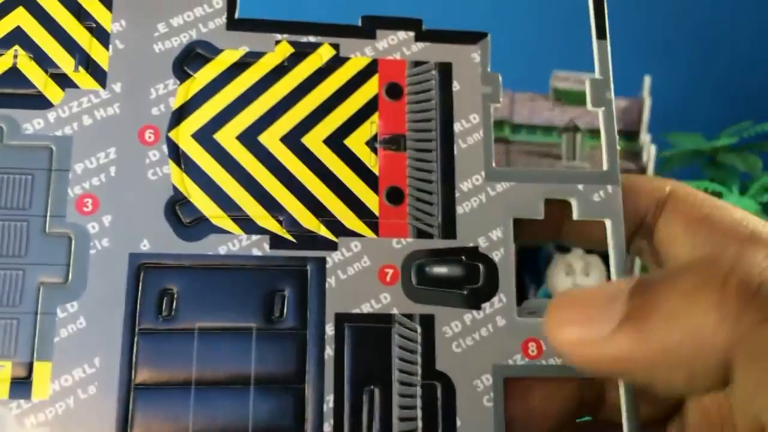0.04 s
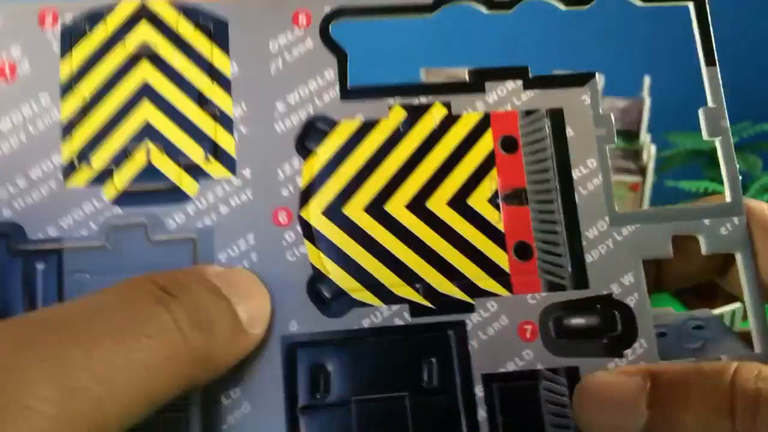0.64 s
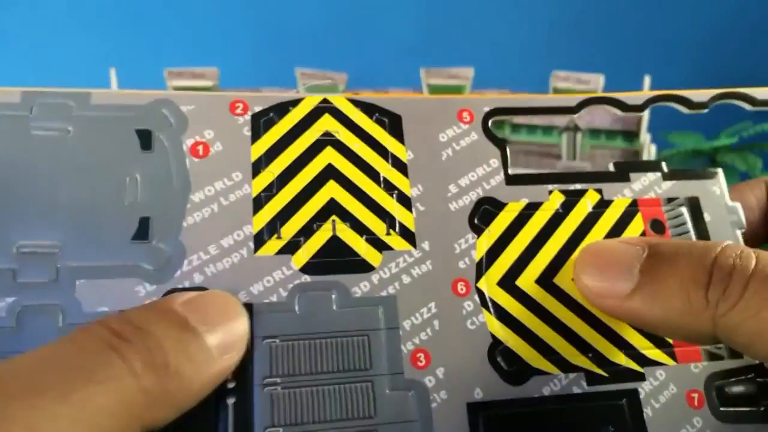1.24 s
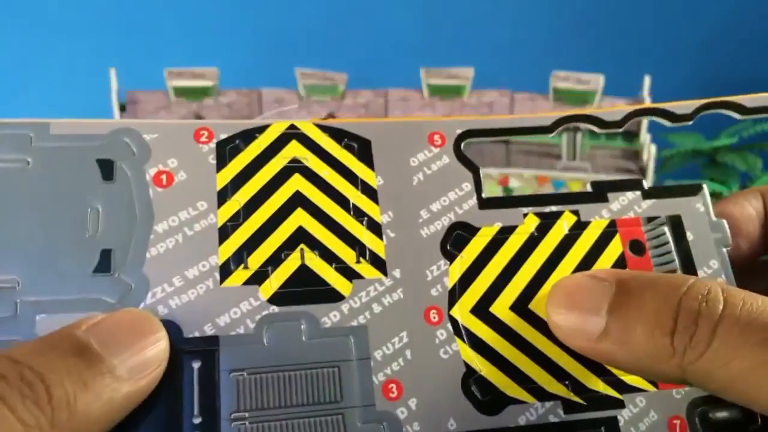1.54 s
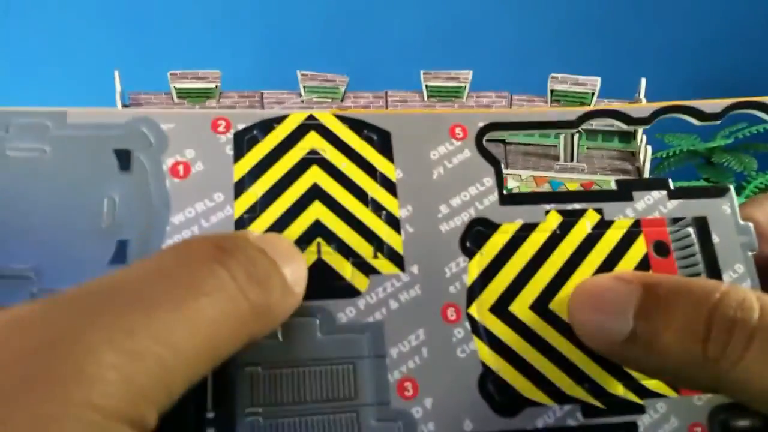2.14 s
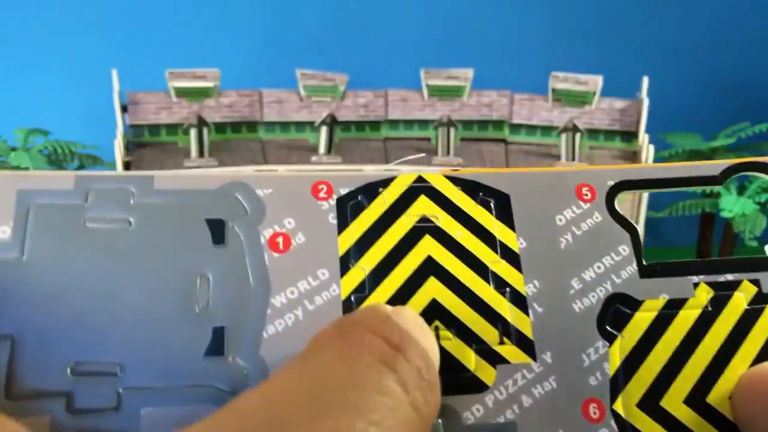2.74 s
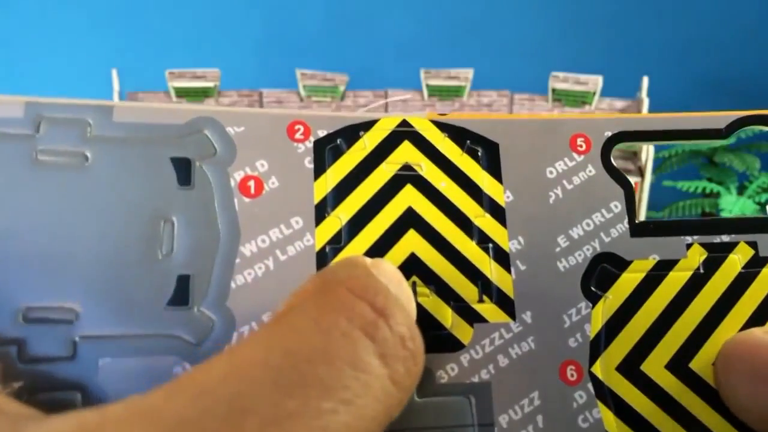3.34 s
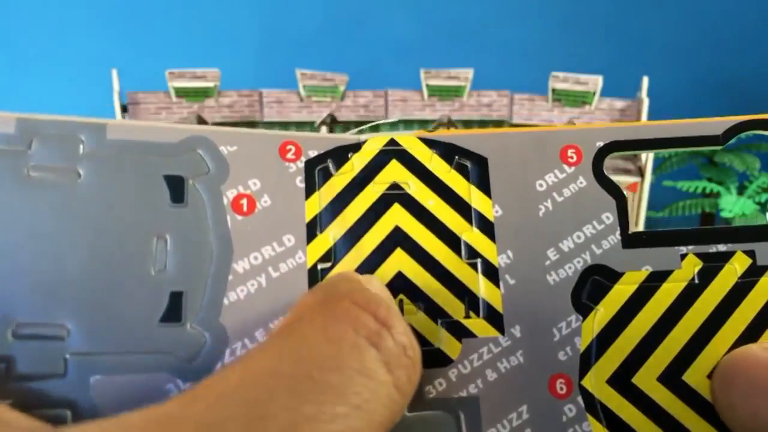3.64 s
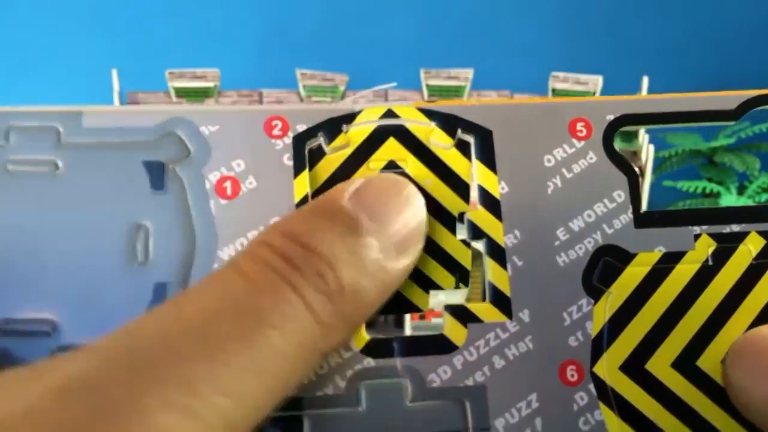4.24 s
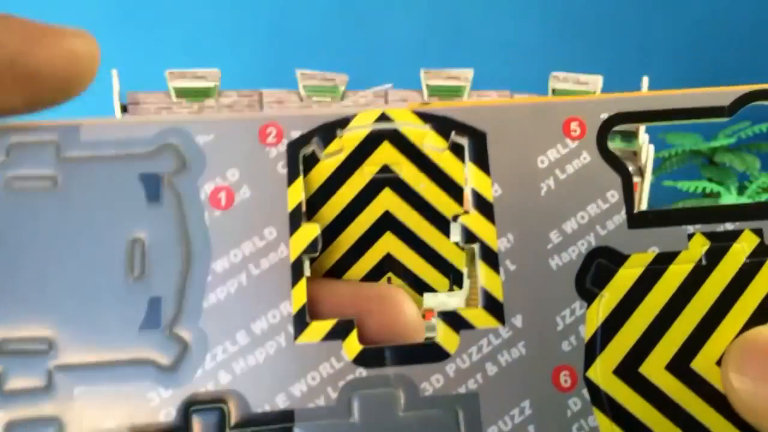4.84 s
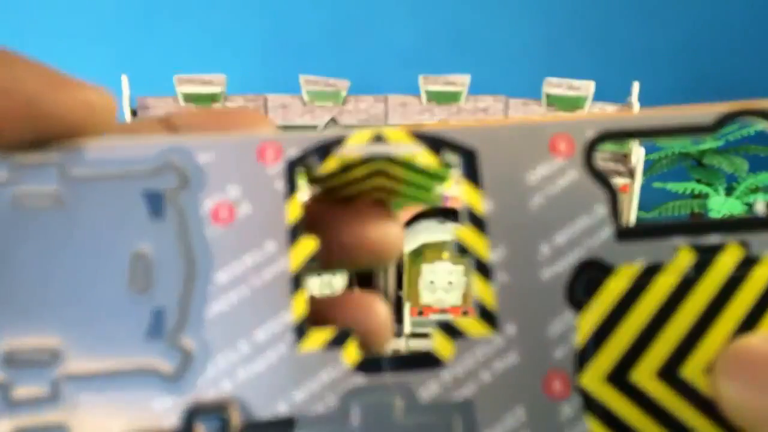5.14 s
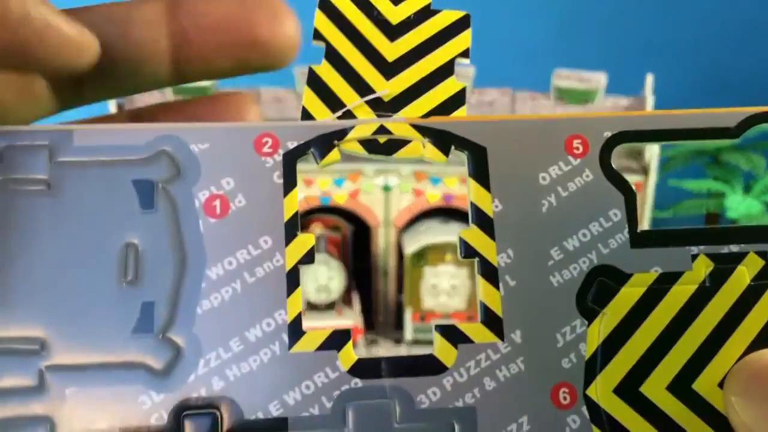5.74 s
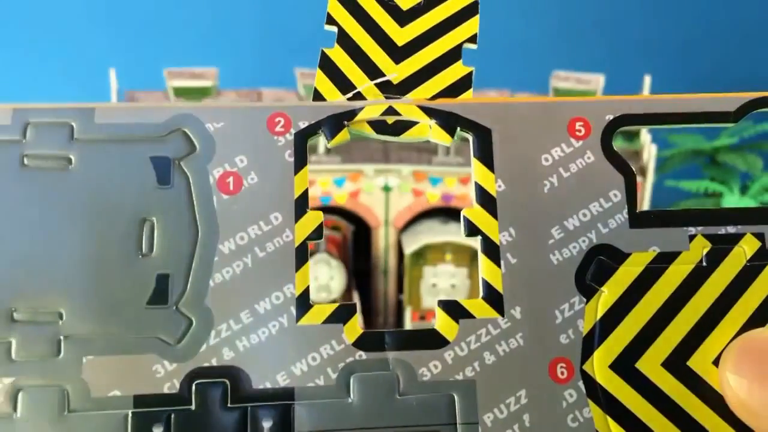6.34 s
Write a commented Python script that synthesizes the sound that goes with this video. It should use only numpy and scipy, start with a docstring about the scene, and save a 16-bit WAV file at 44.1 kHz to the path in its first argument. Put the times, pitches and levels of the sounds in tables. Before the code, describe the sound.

In a room with a faint low hum, a foam puzzle sheet is handled up close, ticking and rasping under the fingers. A faraway bird starts to whistle, and the tabs of a piece break with two loud clusters of crackling snaps. Lighter scrapes, clicks and knocks follow as the piece is pushed out, while the bird finishes with a trill. Then the handling stops.

```python
"""Over the low rumble and hum of a room, fingers slide on a printed foam puzzle board near the microphone.
Friction hisses and rasps, and the bent foam ticks and creaks. From about 3 s a distant songbird sings
one phrase, smeared by echoes from walls. Near 3.6 s and 3.9 s the tabs of a die-cut piece tear in two
bursts of snaps. The freed piece creaks, scrapes and knocks against the frame while the bird ends on
a trill; at about 6 s the hands come to rest."""
import sys
import numpy as np
from scipy import signal
from scipy.fft import rfft, irfft
from scipy.io import wavfile
from scipy.ndimage import uniform_filter1d

SR = 44100
rng = np.random.default_rng(int(sys.argv[2]) if len(sys.argv) > 2 else 0)


def to_wav(s):
    """Save 16-bit WAV."""
    ch = np.atleast_2d(s).T  # columns
    pcm = np.round(np.clip(ch, -1, 1) * 32767)  # PCM
    wavfile.write(sys.argv[1], SR, pcm.astype(np.int16))


N = 286650
TIME = np.arange(N) / SR


def gain_of(db):
    """Amplitude ratio of a level: a factor of ten for every 20 dB."""
    return 10 ** (np.asarray(db) / 20)


def unit_rms(x):
    """Normalisation to an rms amplitude of 1."""
    return x / np.sqrt(np.mean(x ** 2) + 1e-20)


def at_frequency(points, hz):
    """Interpolation of (f/Hz, value) rows on a logarithmic frequency axis."""
    f, value = np.transpose(points)
    return np.interp(np.log(hz + 1), np.log(f + 1), value)


def add(mix, start_s, sound):
    """Superposition: a sound adds to the mix from its onset on."""
    part = mix[max(round(start_s * SR), 0):][:len(sound)]
    part += sound[:len(part)]


def colour(x, spectrum):
    """Minimum-phase filtering: the spectrum is shaped causally, so attacks stay sharp."""
    hz = abs(np.fft.fftfreq(4096, 1 / SR))
    log_gain = np.log(gain_of(at_frequency(spectrum, hz)))
    taps = np.fft.ifft(np.exp(np.conj(signal.hilbert(log_gain)))).real
    return signal.oaconvolve(x, taps[:len(taps) // 2])[:N]


def drift(cutoff_hz):
    """Low-pass noise: a slow random fluctuation of rms 1."""
    hz = np.fft.rfftfreq(N, 1 / SR)
    return unit_rms(irfft(rfft(rng.standard_normal(N)) / (1 + (hz / cutoff_hz) ** 4), N))


def patchy(x, depth_db, bins):
    """Random amplitude modulation: patches of time and frequency swell and fade; rms 1."""
    spectra = signal.stft(x, nperseg=512, noverlap=384)[2]
    field = uniform_filter1d(rng.standard_normal(spectra.shape), bins, axis=0)
    field = uniform_filter1d(field, bins // 2, axis=1)
    spectra = spectra * gain_of(depth_db * unit_rms(field))
    return unit_rms(signal.istft(spectra, nperseg=512, noverlap=384)[1][:N])


def reverb(x, decays, build_s):
    """Diffuse reverberation: a noise tail of unit energy decays exponentially in each band."""
    hz, t, spectra = signal.stft(rng.standard_normal(SR), SR, nperseg=256)
    fade = gain_of(-60 * t / at_frequency(decays, hz)[:, None])
    build_up = 1 - np.exp(-t / build_s)
    tail = signal.istft(spectra * fade * build_up, SR, nperseg=256)[1]
    return signal.oaconvolve(x, tail / np.linalg.norm(tail))[:N]


def rumble():
    """Ambient noise: the room's background is mostly low in frequency and slightly restless in level."""
    # spectrum of the background: f/Hz, level/dB
    spectrum = [(20, -21.5), (50, -5.5), (90, -0.5), (135, -0.5), (180, 2.5), (240, -2), (320, -6.5),
                (450, -6.5), (700, -14), (1100, -20.5), (2400, -31), (5000, -35.5), (12500, -47.5),
                (16000, -42.5)]
    air = colour(patchy(rng.standard_normal(N), depth_db=2.5, bins=8), spectrum)
    return unit_rms(air) * gain_of(-55 + 1.2 * drift(cutoff_hz=6.3))


def hum():
    """Frequency and amplitude modulation: faint low tones in the room waver at random."""
    # tones of the hum: f/Hz, rms level/dB
    tones = [(88, -70), (175, -66), (258, -74), (312, -67.5)]
    out = np.zeros(N)
    for hz, db in tones:
        cycles = np.cumsum(hz + 2.5 * drift(cutoff_hz=8)) / SR
        amplitude = np.sqrt(2) * gain_of(db + 2 * drift(cutoff_hz=1.9))
        out += amplitude * np.sin(2 * np.pi * cycles)
    return out


def syllables(contour, notes, roughness):
    """Frequency modulation: each note glides along a contour, with random tremble scaled by roughness."""
    times, hz, db = np.transpose(contour)
    t, out = np.arange(0, times[-1], 1 / SR), np.zeros(N)
    swell = gain_of(np.interp(t, times, db)) * signal.windows.tukey(len(t), 0.15)
    for start_s, level_db, ratio in notes:
        unsteady = roughness * gain_of(-(level_db + 40) / 2)  # soft notes are less steady
        tremble = unsteady * unit_rms(uniform_filter1d(rng.standard_normal(len(t)), size=60))
        phase = 2 * np.pi * np.cumsum(ratio * np.interp(t, times, hz) * (1 + tremble)) / SR
        tone = np.sin(phase) + gain_of(-26) * np.sin(2 * phase)
        add(out, start_s, gain_of(level_db) * swell * tone)
    return out


def bird():
    """Multipath propagation: whistles, slurs, arches and a trill arrive mostly by reflection from walls."""
    # syllable contours: t/s from the onset, f/Hz, level/dB
    whistle = [(0, 2246, -10.5), (.012, 2321, 6), (.05, 2420, -3.5), (.07, 2430, -20)]
    slur = [(0, 3700, -18.5), (.02, 3300, -1.5), (.04, 2970, -4), (.06, 2980, -18.5), (.075, 3150, -11)]
    arch = [(0, 3240, -19), (.017, 3350, -4), (.03, 3860, -1.5), (.038, 3972, 2.5), (.048, 3584, 0),
            (.057, 2975, 3.5), (.068, 2480, -9)]
    chip = [(0, 3130, 10), (.005, 2963, 2), (.012, 2500, 2.5), (.02, 1950, -0.5), (.03, 1542, -17)]
    squeak = [(0, 6600, -24), (.012, 6640, 2.5), (.024, 7700, 12.5), (.034, 6700, -12), (.046, 5600, 1),
              (.054, 5200, -11)]
    # notes sung on those contours: t/s, level/dB, frequency ratio
    whistles = [(2.909, -61.5, 1.02), (3.371, -57.5, 0.75), (3.712, -42.5, 1.0), (4.04, -51.5, .89)]
    slurs = [(3.105, -58, 1.26), (3.728, -32.5, 0.98), (4.516, -45.5, 0.53), (4.688, -49, 0.48),
             (4.861, -45.5, 0.52)]
    arches = [(4.175, -35.5, 0.98), (4.293, -35, 0.93), (4.394, -34, 0.97)]
    trill = [(4.575, -39, 0.93), (4.741, -38.5, .97), (4.904, -37, 0.95), (5.07, -39, 0.93),
             (5.239, -39, .94), (5.418, -40, 0.99)]
    # wall reflections: delay t/s, level/dB
    walls = [(.056, -11.5), (.083, -13.5)]
    # reverberation time outdoors: f/Hz, T60/s
    yard = [(1500, 0.67), (3500, 0.8), (7000, 0.76)]
    # a softer squeak follows every chip of the trill but the last
    squeaks = [(start_s + 0.069, db - 13.5, ratio * 0.94) for start_s, db, ratio in trill[:-1]]
    song = syllables(whistle, whistles, roughness=0.025)
    song += syllables(slur, slurs, roughness=0.012)
    song += syllables(arch, arches, roughness=0.008)
    song += syllables(chip, trill, roughness=0.028)
    song += syllables(squeak, squeaks, roughness=0.022)
    heard = gain_of(-3.5) * song  # direct path
    for delay_s, db in walls:
        add(heard, delay_s, gain_of(db) * song)
    early_echoes = rng.standard_normal(2500) * signal.windows.tukey(2500, 0.2)
    heard += gain_of(-0.5) * signal.oaconvolve(song, early_echoes / np.linalg.norm(early_echoes))[:N]
    return heard + gain_of(-2) * reverb(song, yard, build_s=0.01)


def board(force):
    """Modal response: the sheet follows a force at once, then rings briefly in its damped modes."""
    # modes of the board: f/Hz, level/dB, T60/s
    modes = [(380, -35.5, 0.025), (690, -33.5, 0.029), (797, -22, 0.031), (986, -34, 0.041),
             (1092, -30.5, 0.031), (2105, -29.5, 0.01), (3720, -13.5, 0.0099)]
    t = TIME[:SR // 8]
    ring = sum(gain_of(db - 60 * t / t60) * np.cos(2 * np.pi * hz * t) for hz, db, t60 in modes)
    return force + gain_of(-16.5) * signal.oaconvolve(force, ring)[:N]


def swing(hz, decay_cycles=1.1):
    """Damped oscillation: the sheet swings a few times while the hands absorb its energy."""
    t = TIME[:SR // 8]
    return np.exp(-t * hz / decay_cycles) * np.sin(2 * np.pi * hz * t)


def tear(decay_s, attack_s=0.00019):
    """Fracture noise: breaking foam cells give a short burst with the energy of 5 ms at rms 1."""
    t = TIME[:512]
    envelope = (1 - np.exp(-t / attack_s)) ** 2 * np.exp(-t / decay_s)
    spectrum = rfft(rng.standard_normal(len(t)) * envelope)
    flattened = spectrum / np.sqrt(abs(spectrum) + 1e-9)  # each burst keeps some colour of its own
    burst = irfft(flattened) * np.sqrt(envelope)
    return burst / np.linalg.norm(burst) * np.sqrt(0.005 * SR)


def stroke(t, length_s, attack_s=0.0076, release_s=0.015):
    """Envelope of sliding: a finger eases up to speed near t = 0, slides on and comes to rest."""
    t = t - attack_s
    rise = np.tanh(t / (2 * attack_s))
    fall = np.tanh((t - length_s) / (2 * release_s))
    return (1 + rise) / 2 * (1 - fall) / 2


def contact():
    """Incoherent sources add in power: strokes and a fluttering grip set the gains of hiss and rasp."""
    # strokes of skin or a cut edge over the board: t/s, duration/s, hiss level/dB, rasp level/dB
    strokes = [(0, 0.051, -52, -64), (0.354, 0.084, -53.5, -64), (0.462, 0.071, -48, -61),
               (0.652, 0.044, -42.5, -46.5), (0.742, .06, -51.5, -48.5), (0.8, 0.054, -43.5, -50),
               (0.881, 0.042, -40.5, -48), (0.994, 0.046, -47, -50), (1.06, 0.1, -56, -64),
               (1.142, 0.069, -42, -47.5), (1.248, 0.1, -51, -58), (1.347, 0.072, -43, -51),
               (1.453, 0.071, -51, -51.5), (1.535, .055, -52.5, -58.5), (1.968, .1, -44.5, -47),
               (2.087, .04, -44, -42), (2.32, 0.41, -64, -61), (2.607, 0.042, -46.5, -44),
               (2.68, 0.021, -41.5, -45), (2.766, 0.025, -46, -68), (3.057, 0.28, -64.5, -59),
               (3.191, 0.054, -57.5, -56), (3.315, 0.066, -56, -48.5), (3.368, 0.092, -44, -56),
               (3.478, 0.26, -41.5, -51), (3.704, 0.13, -48.5, -55), (3.851, 0.17, -40.5, -46),
               (4.03, 0.14, -59, -62), (4.2, 0.14, -52, -52), (4.323, 0.21, -47.5, -51.5),
               (4.422, 0.058, -38, -36.5), (4.502, 0.057, -48.5, -72), (4.588, 0.018, -38, -39),
               (4.66, 0.52, -57.5, -57), (5.13, 0.21, -53, -51.5), (5.335, 0.13, -48, -46),
               (5.466, 0.28, -51.5, -54), (5.845, 0.1, -56, -54)]
    holding_hand = (0, 5.98, -73, -67)  # one long, faint stroke
    t = TIME[::32]
    powers = sum(np.outer(gain_of([hiss_db, rasp_db]), stroke(t - start_s, length_s)) ** 2
                 for start_s, length_s, hiss_db, rasp_db in [holding_hand, *strokes])
    flutter = gain_of(1.8 * drift(cutoff_hz=32.5))
    return [np.interp(TIME, t, np.sqrt(power)) * flutter for power in powers]


def friction(catches_per_s, spread_db, smooth):
    """Shot noise: many tiny catches of uneven size lie over the white noise of a smooth slide."""
    sizes = gain_of(spread_db * np.minimum(rng.exponential(1, N), 2.5))
    catches = sizes * rng.choice([-1, 1], N) * (rng.random(N) < catches_per_s / SR)
    return unit_rms(unit_rms(catches) + smooth * rng.standard_normal(N))


def rubbing(ticks_per_s=27, tick_db=-1.5):
    """Sliding friction: the contact hisses, drives the board to rasp and ticks over cut lines."""
    # spectra of the contact hiss and of the rasping force: f/Hz, level/dB
    hiss_spectrum = [(200, -42), (1000, -3.5), (2200, 0), (3500, -1), (5500, -1.5), (8000, 0), (10000, 0.5),
                     (12000, 3), (14000, 1), (16000, -4)]
    rasp_spectrum = [(40, -7.5), (150, 12.5), (350, 10.5), (550, 6), (850, -2.5), (1250, 4.5), (1800, 6.5),
                     (2800, -1), (5000, -6.5), (12000, -20.5)]
    hiss_gain, rasp_gain = contact()
    hiss = patchy(friction(catches_per_s=5700, spread_db=3.5, smooth=0.25), depth_db=2, bins=10)
    rasp = patchy(friction(catches_per_s=900, spread_db=2, smooth=0.93), depth_db=3.5, bins=6)
    catches = rng.uniform(0.33, 2.4, N) * (rng.random(N) < ticks_per_s / SR)
    ticks = signal.oaconvolve(gain_of(tick_db) * hiss_gain * catches, tear(decay_s=0.003))[:N]
    surface = colour(hiss * hiss_gain + ticks, hiss_spectrum)
    return surface + board(colour(rasp * rasp_gain, rasp_spectrum))


def skids():
    """Nearly periodic stick-slip: skin or a cut edge gives a gliding whistle of narrow-band noise."""
    # skids: t/s, duration/s, level/dB, first f/Hz, last f/Hz
    glides = [(0.804, 0.047, -43.5, 9500, 9900), (.84, 0.1, -47, 11600, 12700),
              (1.146, .07, -49, 1800, 1767), (1.479, 0.028, -51.5, 1895, 2160),
              (1.956, .10, -45.5, 10900, 11400), (1.975, .075, -50.5, 880, 964),
              (3.545, 0.041, -41.5, 5560, 5330), (4.434, 0.058, -44.5, 655, 740),
              (4.436, 0.052, -42.5, 1093, 1220)]
    out = np.zeros(N)
    for start_s, length_s, db, first_hz, last_hz in glides:
        n = round(length_s * SR)
        hz = np.linspace(first_hz, last_hz, n)
        width_hz = 150 + 0.14 * first_hz
        pole = np.exp(-np.pi * width_hz / SR)
        noise = rng.standard_normal(n) + 1j * rng.standard_normal(n)
        jitter = signal.lfilter([1], [1, -2 * pole, pole * pole], noise)
        whistle = (jitter * np.exp(2j * np.pi * np.cumsum(hz) / SR)).real
        add(out, start_s, gain_of(db) * unit_rms(whistle) * signal.windows.tukey(n, 0.5))
    return out


def creaks(slips_per_s=160, unevenness=0.4, spread_db=1):
    """Irregular stick-slip: bent foam creaks in runs of small slips, as rows of t/s, level/dB, f/Hz."""
    # runs of slips: t/s, duration/s, level/dB, f/Hz
    runs = [(1.981, .06, -38.5, 800), (2.488, .006, -40, 1400), (2.561, .006, -32, 2300),
            (2.625, .025, -37.5, 1900), (2.69, .022, -30.5, 2300), (3.228, .005, -34.5, 2200),
            (3.335, .016, -36.5, 850), (3.521, .02, -25, 2400), (4.2, .09, -42.5, 430),
            (4.611, .015, -36, 1300)]
    slips = []
    for start_s, length_s, db, hz in runs:
        gap, size, pitch = rng.standard_normal((3, 40))
        after_s = np.cumsum([0, *np.exp(unevenness * gap[1:])]) / slips_per_s
        run = np.transpose([start_s + after_s, db + spread_db * size, hz * np.exp(0.12 * pitch)])
        slips += list(run[after_s < length_s])
    return slips


def knocks():
    """Impulsive excitation: bumps and creaking slips swing the sheet and set its modes ringing."""
    # dull slips and bumps of the board: t/s, level/dB, f/Hz
    bumps = [(0.4467, -32.5, 245), (0.862, -28.5, 99), (0.881, -36, 102), (1.35, -37, 90),
             (1.979, -30, 356), (3.3375, -29, 620), (3.6139, -26, 230), (3.6275, -14, 830),
             (3.63, -12, 1120), (3.636, -12.5, 980), (3.815, -34.5, 950), (3.8345, -22.5, 1020),
             (3.845, -22, 980), (3.8505, -24.5, 1010), (3.881, -25.5, 332), (3.898, -27.5, 85),
             (3.93, -28.5, 85), (4.438, -26.5, 192), (4.439, -24, 610), (4.473, -23, 118),
             (4.481, -23.5, 1110), (5.35, -41, 280), (5.3702, -32, 272), (5.443, -27.5, 313)]
    swings = np.zeros(N)
    for start_s, db, hz in bumps + creaks():
        add(swings, start_s, gain_of(db) * swing(hz))
    bass_cut = signal.butter(1, 60, "high", fs=SR, output="sos")  # a small sheet radiates little bass
    return board(signal.sosfilt(bass_cut, swings))


def snaps(even_decay_s=0.0018, db_per_doubling=37.5):
    """Release of elastic energy: each tab cracks and kicks the board, which flexes and swings."""
    # tabs tearing and cut edges snapping past each other: t/s, crack level/dB, flex level/dB
    breaks = [(0.036, -47.5, -68), (0.4508, -47, -59), (.8128, -36, -42), (0.8242, -52, -32.5),
              (0.83, -32.5, -43), (1.967, -41, -41.5), (1.9789, -38, -50), (2.6892, -62, -42.5),
              (2.771, -37.5, -52), (2.7793, -43, -46), (3.118, -45, -72), (3.194, -47, -55),
              (3.3044, -35.5, -38.5), (3.4903, -40, -45), (3.5234, -38, -36.5), (3.5725, -20, -32),
              (3.5816, -12, -23), (3.6029, -23.5, -19), (3.6061, -18, -22), (3.612, -18.5, -18.5),
              (3.6193, -12.5, -20), (3.6266, -19.5, -19.5), (3.6296, -19, -23.5), (3.6358, -15.5, -21.5),
              (3.6513, -13, -17.5), (3.6744, -20, -32.5), (3.6816, -20.5, -25.5), (3.8677, -21, -20),
              (3.8779, -17.5, -19.5), (3.903, -25, -33), (3.914, -17, -19.5), (3.926, -11, -15.5),
              (3.94, -28, -37), (4.002, -35, -36.5), (4.049, -29.5, -41.5), (4.1296, -41, -61.5),
              (4.249, -22.5, -40.5), (4.255, -22.5, -61), (4.2712, -24.5, -45), (4.4264, -22.5, -43),
              (5.1395, -40, -37.5), (5.2012, -37.5, -55), (5.3358, -26.5, -34.5), (5.3398, -20, -43),
              (5.5537, -34, -50), (5.666, -36, -54), (6.4505, -49.5, -64.5)]
    # spectra of the bright crack and of the duller flex: f/Hz, level/dB
    crack_spectrum = [(200, -19), (1200, -17), (2500, -2.5), (3700, -0.5), (5800, -7.5), (7700, -1),
                      (10500, -4), (12700, 4.5), (14000, 2.5), (15500, -11), (16500, -19.5)]
    flex_spectrum = [(40, -22.5), (150, 3.5), (480, 4), (850, 2), (1400, 5), (2100, 5.5), (3200, -3.5),
                     (8000, -7)]
    crack, flex, sway = np.zeros((3, N))
    for start_s, crack_db, flex_db in breaks:
        # a snap that bends the board more lasts longer
        decay_s = even_decay_s * 2 ** ((flex_db - crack_db) / db_per_doubling)
        add(crack, start_s, gain_of(crack_db) * tear(decay_s))
        add(flex, start_s, gain_of(flex_db) * tear(1.6 * decay_s))
        add(sway, start_s, gain_of(flex_db - 8) * swing(hz=192))
    return colour(crack, crack_spectrum) + board(colour(flex, flex_spectrum)) + sway


def scene():
    """Superposition of the close board, its weak reverberation, bird and background; channels alike."""
    # reverberation time of the room: f/Hz, T60/s
    room = [(100, 0.2), (800, 0.22), (3000, 0.21), (12000, 0.12), (16000, 0.19)]
    near = snaps() + knocks() + rubbing() + skids()
    room_tail = gain_of(-12) * reverb(near, room, build_s=0.001)
    mono = near + room_tail + bird() + rumble() + hum()
    return np.array([mono, mono])


def record(dry, hiss_db=-73.5, cutoff_hz=15900):
    """Self-noise, clipping and band limit: the microphone adds hiss and cuts peaks beyond full scale."""
    heard = dry + gain_of(hiss_db) * rng.standard_normal(N)
    low_pass = signal.firwin(255, cutoff_hz, window=("kaiser", 8), fs=SR)
    return signal.oaconvolve(np.clip(heard, -1, 1), low_pass[None], "same")


dry = scene()
out = record(dry)
to_wav(out)
```